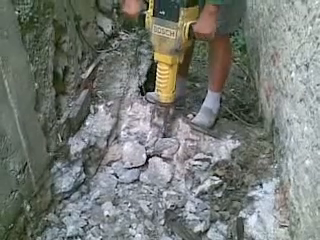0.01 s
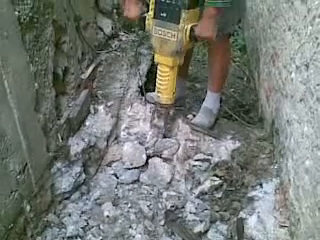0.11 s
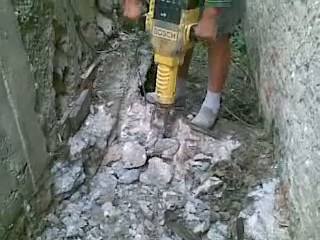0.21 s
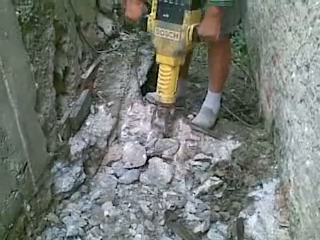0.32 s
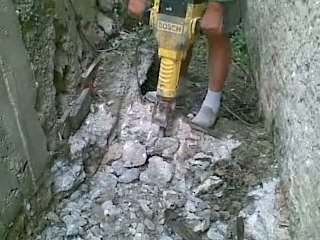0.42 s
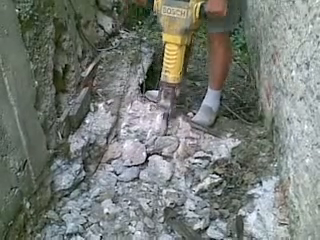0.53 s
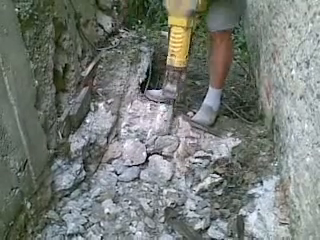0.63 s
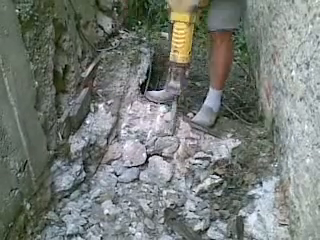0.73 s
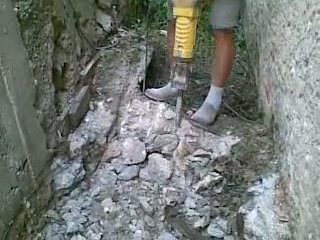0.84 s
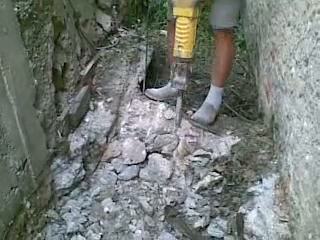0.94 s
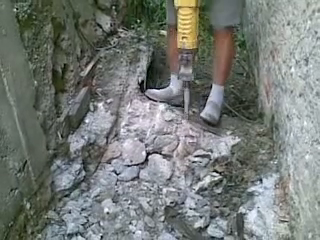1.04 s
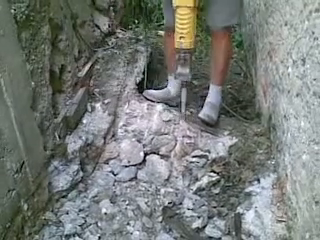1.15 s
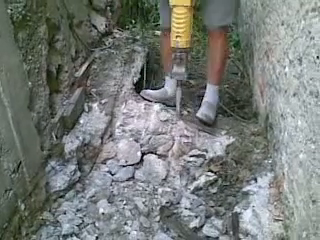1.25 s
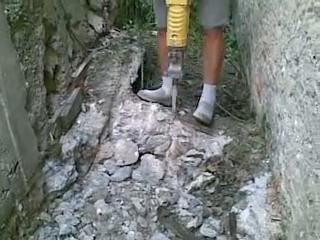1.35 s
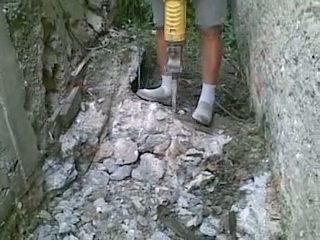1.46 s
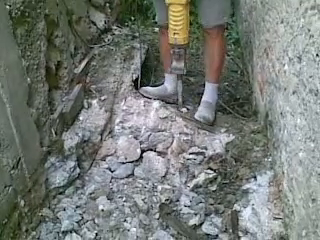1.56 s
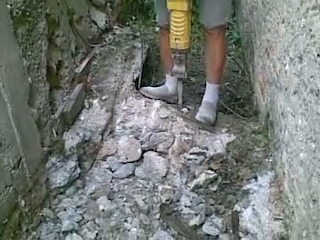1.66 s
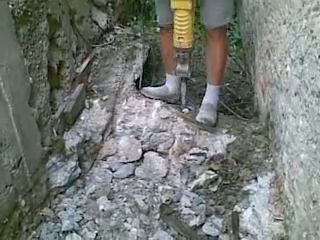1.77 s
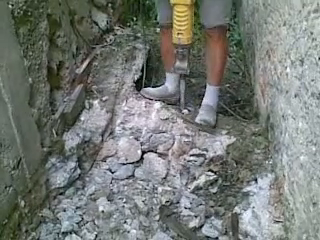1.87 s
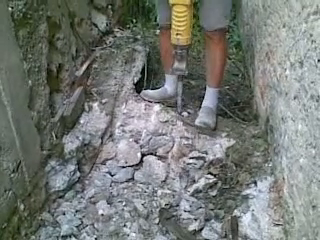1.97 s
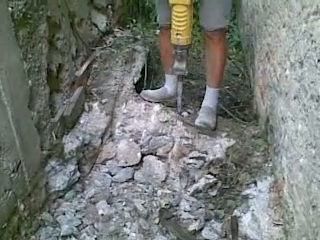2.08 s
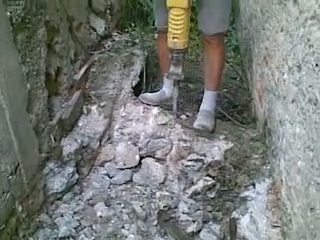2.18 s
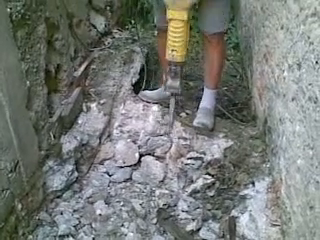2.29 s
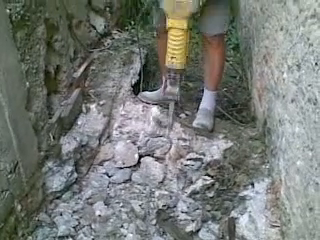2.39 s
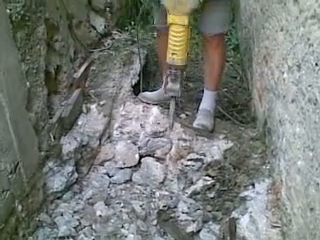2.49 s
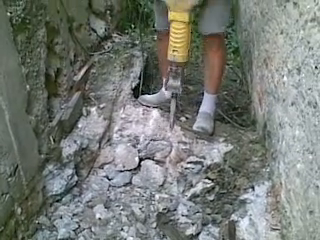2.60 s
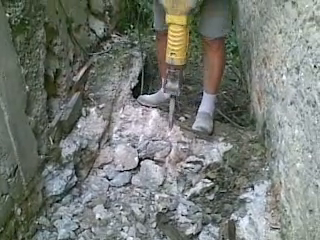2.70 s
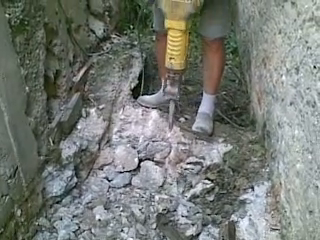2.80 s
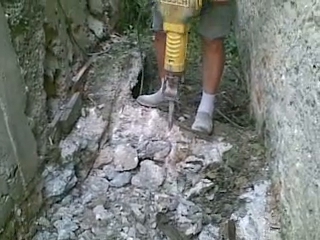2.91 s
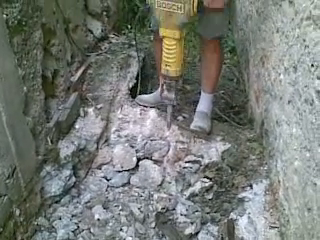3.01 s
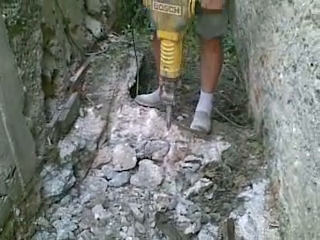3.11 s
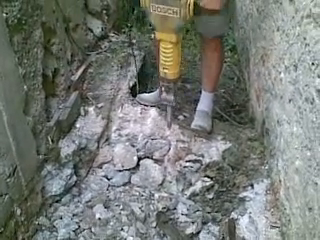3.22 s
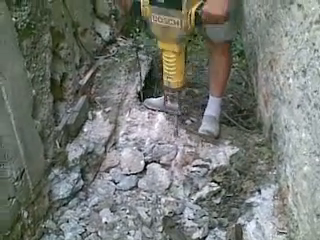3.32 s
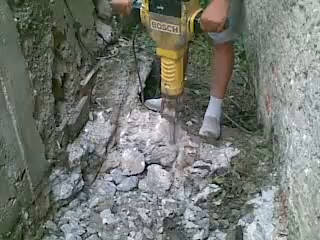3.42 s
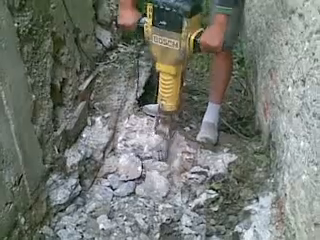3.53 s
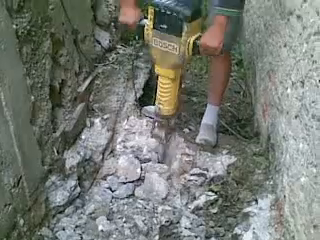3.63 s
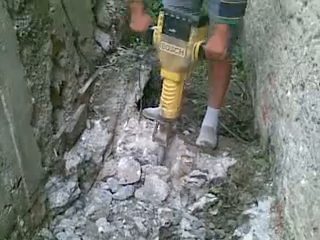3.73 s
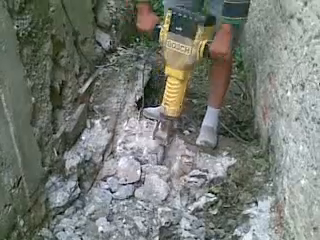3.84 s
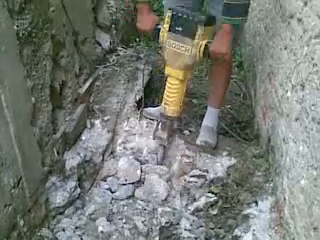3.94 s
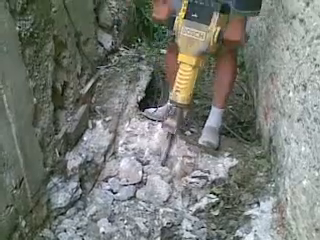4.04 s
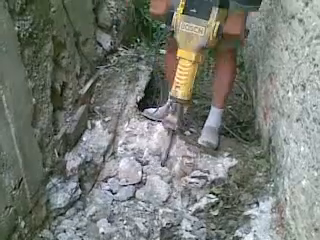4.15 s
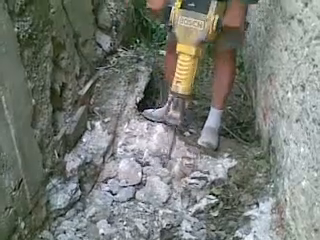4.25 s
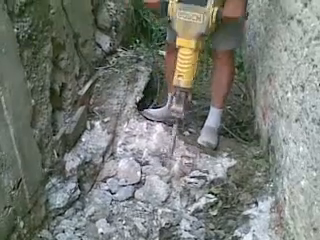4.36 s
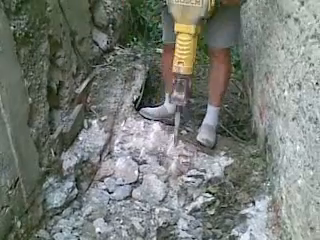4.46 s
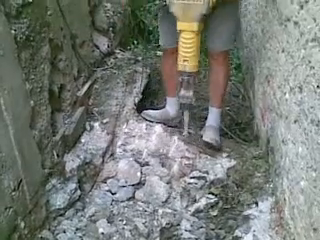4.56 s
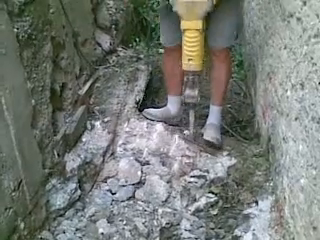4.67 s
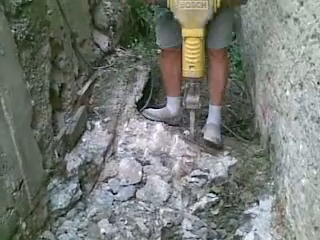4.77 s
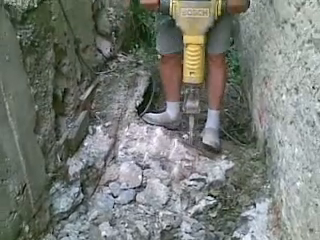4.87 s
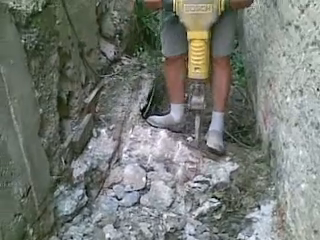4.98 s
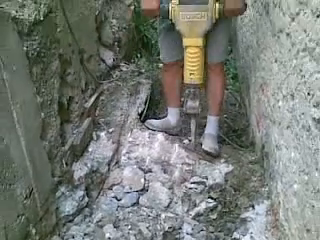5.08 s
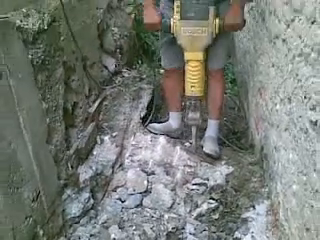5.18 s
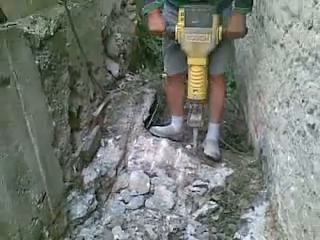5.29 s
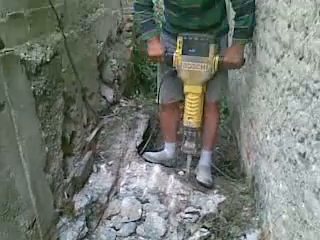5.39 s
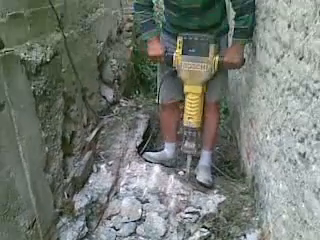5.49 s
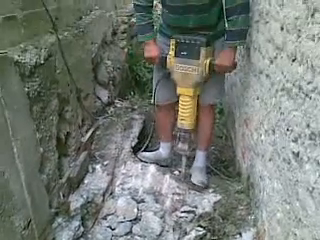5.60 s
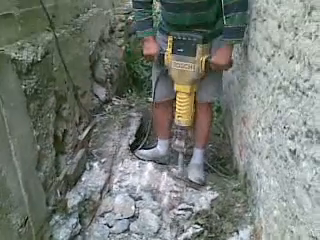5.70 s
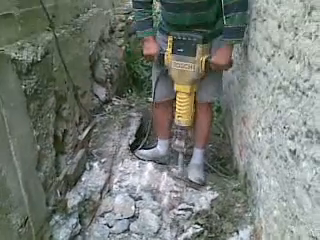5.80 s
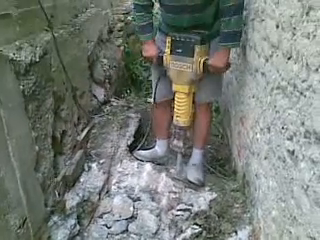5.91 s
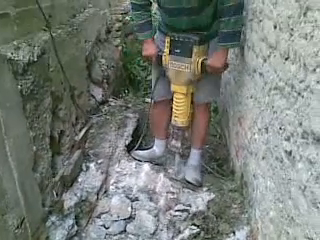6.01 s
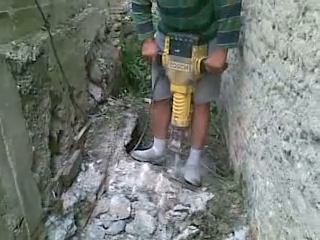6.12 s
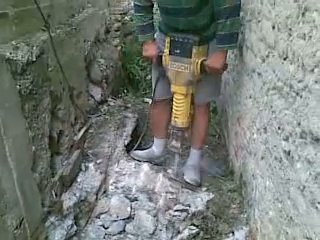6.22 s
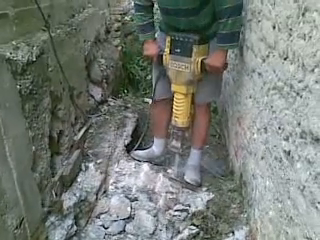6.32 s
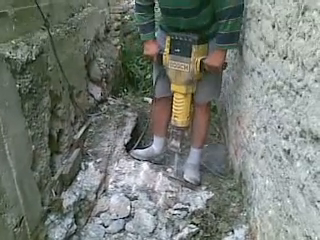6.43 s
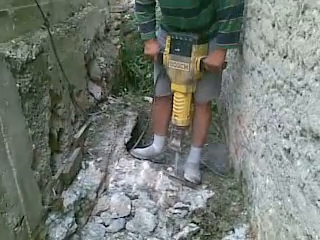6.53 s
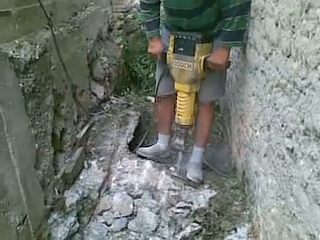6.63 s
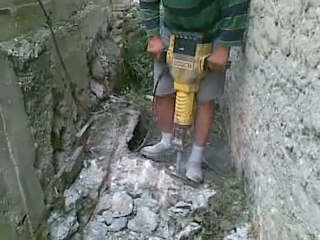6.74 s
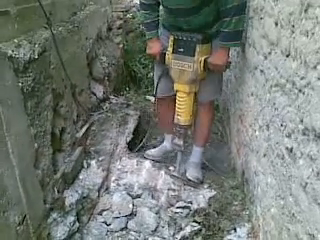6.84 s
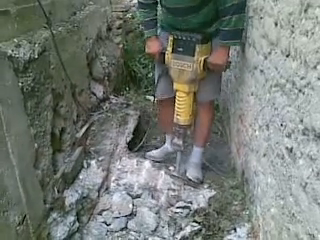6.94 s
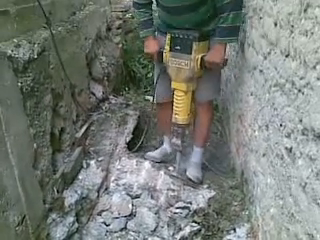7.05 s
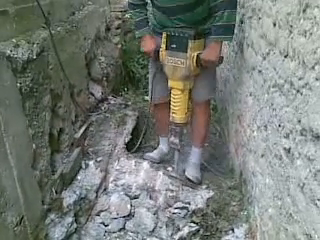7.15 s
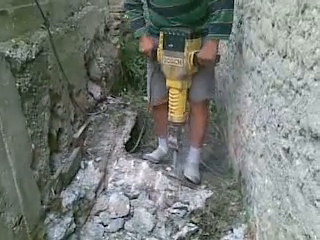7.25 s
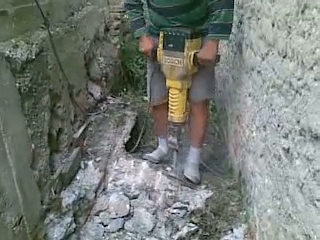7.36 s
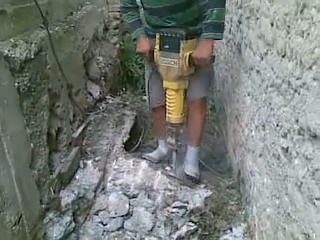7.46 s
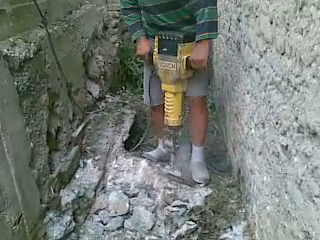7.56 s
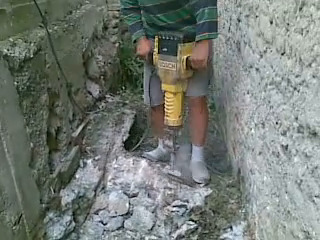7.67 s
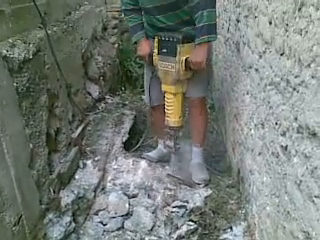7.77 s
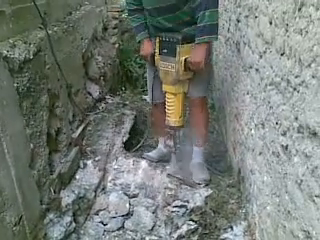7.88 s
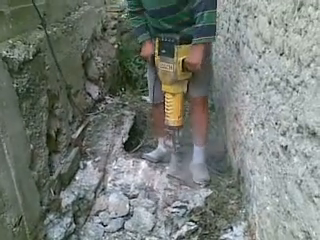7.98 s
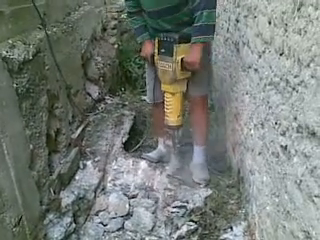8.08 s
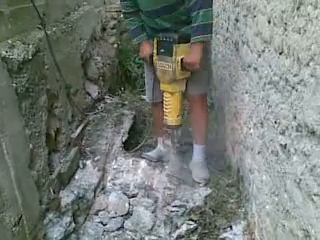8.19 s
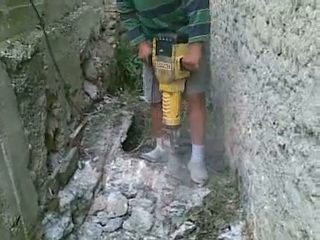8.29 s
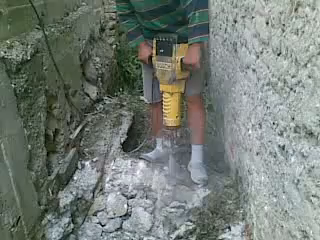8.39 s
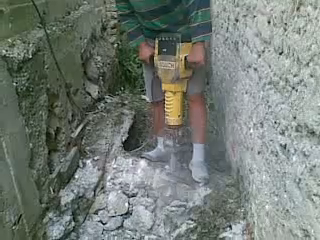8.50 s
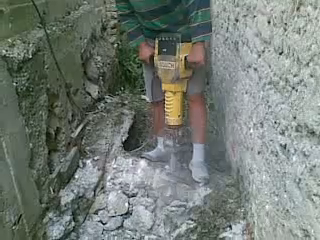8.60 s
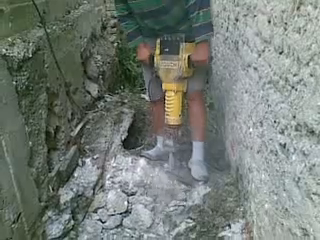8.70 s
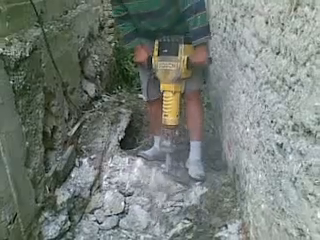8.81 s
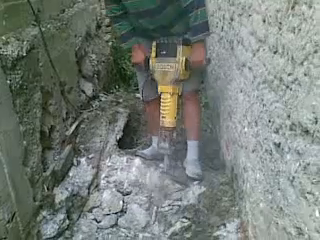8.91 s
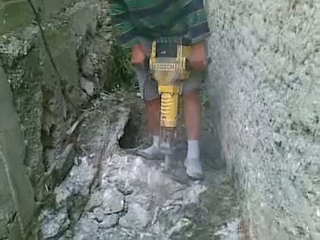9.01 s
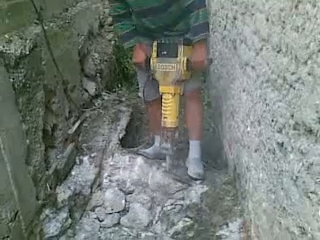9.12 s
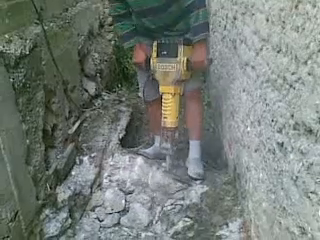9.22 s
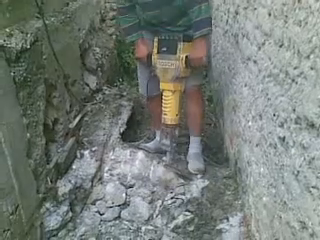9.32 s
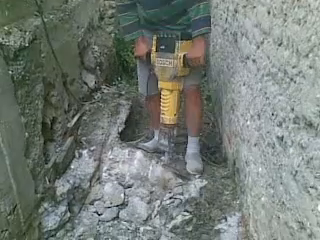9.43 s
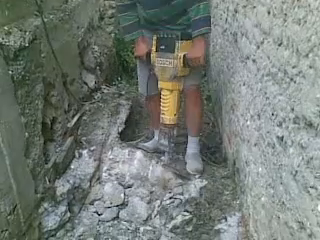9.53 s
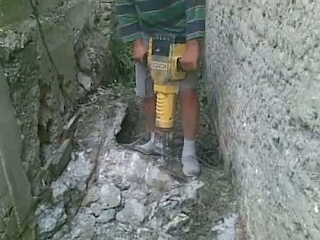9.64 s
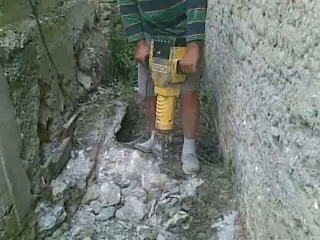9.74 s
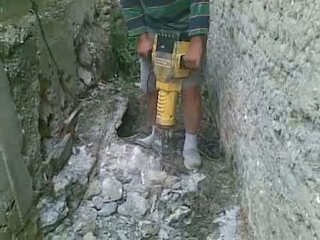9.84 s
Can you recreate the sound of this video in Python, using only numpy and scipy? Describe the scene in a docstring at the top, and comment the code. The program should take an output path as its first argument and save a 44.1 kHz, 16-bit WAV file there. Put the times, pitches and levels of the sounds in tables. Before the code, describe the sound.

Close, dry and harsh: sharp steel-on-concrete blows at about sixteen to nineteen a second over gear whirr and a high whine. The first burst winds down into spaced clacks and a near pause, a gritty restart gives a short second burst, that slows too, and the last long burst continues to the end. Faint outdoor background and low rumble sit underneath, with tight trench reflections.

```python
"""A narrow trench, where an electric demolition hammer chisels concrete rubble close to a small microphone.
The motor hammers, coasts down with loose knocks, starts again, slows once more, then hammers to the end.
Whirr, hiss and growl are shaped noise; the whine is noise in a narrow band that follows the speed, and the
gear teeth sing as sines. Each blow cracks as a noise burst, kicks the resonances of the steel chisel and
thumps the ground with decaying sines; sparse echoes from the trench walls throw the steel back."""
import sys
import numpy as np
from scipy import signal
from scipy.io import wavfile
from scipy.ndimage import uniform_filter1d

SR = 44100
rng = np.random.default_rng(int(sys.argv[2]) if len(sys.argv) > 2 else 0)


def materialize(psi):
    """Save the field psi as 16-bit PCM at rate SR to the path in sys.argv[1].

    A 1-D psi becomes a single channel; in a 2-D psi each row is a channel.
    """
    bounded = np.clip(np.atleast_2d(psi).T, -1, 1)
    quanta = np.round(bounded * 32767).astype(np.int16)
    wavfile.write(sys.argv[1], SR, quanta)


N = 438354

# Levels in the tables are relative; each layer is trimmed where it is mixed.

# Hammer blows. Each row: start in seconds, crack in dB, chatter length in seconds, chisel ring in dB.
BLOWS = [(.036,-29,0.02,-32),(.144,-31,.034,-47),(.191,-21,0.032,-29),(.244,-21,0.014,-39),(.299,-18,0.012,-39),(.353,-19.5,0.018,-39),
         (.4184,-19,0.011,-31),(.47,-19,0.028,-51),(.534,-23.5,0.015,-55),(.596,-26.5,.034,-47),(.676,-25,0.024,-49),(.756,-22.5,0.026,-55),
         (.839,-22,0.025,-49),(.935,-17.5,.016,-44),(1.0096,-24,0.029,-46),(1.126,-21.5,.012,-50),(1.238,-20.5,0.023,-52),(1.349,-22,0.016,-55),
         (1.4916,-21,0.0076,-58),(1.664,-15.5,0.012,-55),(1.8323,-21.5,0.016,-56),(2.263,-22,0.028,-31.5),(2.3,-27.5,0.011,-55),(2.424,-44,.011,-80),
         (2.541,-20,0.019,-60),(2.668,-43,.011,-78),(2.739,-39,.0098,-66),(2.794,-46,.012,-78),(3.123,-28.5,0.006,-72),(3.167,-20,0.016,-59),
         (3.199,-18,0.097,-45),(3.295,-17,0.051,-29),(3.332,-27,.034,-19),(3.404,-22.5,0.029,-19.5),(3.4884,-17,0.0074,-25.5),(3.544,-21.5,0.022,-28),
         (3.6113,-15,0.014,-26),(3.667,-19.5,0.022,-24.5),(3.722,-24,0.013,-28.5),(3.78,-25,0.028,-33),(3.8385,-20.5,.02,-28),(3.893,-23,0.015,-23),
         (3.9524,-30,0.019,-39),(4.014,-16.5,.011,-49),(4.0792,-15,0.0066,-49),(4.145,-15.5,0.0092,-49),(4.211,-16.5,0.018,-47),(4.275,-21,0.03,-46),
         (4.344,-25,0.042,-46),(4.443,-23.5,0.025,-46),(4.5343,-17,.012,-51),(4.6276,-21,0.014,-56),(4.729,-23.5,0.015,-44),(5.1953,-17.5,.018,-20),
         (5.3248,-47,.017,-72),(5.4184,-17,0.0087,-29),(5.6486,-20,.05,-21),(5.736,-19,0.025,-19.5),(5.8077,-21,0.022,-21.5),(5.8796,-20,0.024,-22),
         (5.9483,-18,0.014,-22.5),(6.0147,-18,.019,-23),(6.078,-16.5,0.013,-26),(6.1434,-17,0.012,-25),(6.2045,-18,0.025,-26),(6.2707,-19.5,.028,-19.5),
         (6.334,-15,.011,-23),(6.3959,-17.5,.032,-22.5),(6.4584,-13.5,.012,-25),(6.52,-18.5,0.021,-25),(6.585,-15.5,0.016,-24),(6.644,-19.5,0.026,-26),
         (6.706,-19.5,0.015,-30),(6.77,-12,0.014,-24),(6.8273,-17.5,0.033,-28),(6.8904,-15.5,0.012,-23.5),(6.953,-18,0.021,-20.5),(7.0174,-14.5,0.0096,-22),
         (7.075,-18,0.026,-26),(7.1397,-17.5,0.015,-23.5),(7.2013,-22,0.036,-27),(7.2624,-16,0.023,-24),(7.3327,-14,0.0097,-26),(7.3896,-17.5,0.014,-22.5),
         (7.4537,-16.5,.012,-21),(7.5197,-20,0.015,-20.5),(7.579,-21,0.017,-18),(7.644,-17.5,.012,-26),(7.707,-23,0.019,-31.5),(7.7706,-22,.017,-27),
         (7.8346,-16.5,.014,-25),(7.8995,-15.5,.013,-24.5),(7.961,-18,.021,-23),(8.0266,-17,.012,-26),(8.087,-20.5,0.013,-29),(8.151,-24,.024,-27.5),
         (8.213,-21.5,.032,-22),(8.276,-15,0.015,-35),(8.339,-17.5,0.024,-21.5),(8.3995,-17,0.016,-27),(8.4636,-13,0.0097,-29),(8.5256,-17,0.02,-26),
         (8.592,-15,0.01,-22.5),(8.6566,-20.5,.016,-21),(8.724,-20,.014,-31),(8.7838,-13.5,.01,-24),(8.847,-20,.016,-18.5),(8.898,-23.5,.021,-43),
         (8.947,-31,.038,-42),(9,-25,0.022,-29),(9.064,-23,0.023,-47),(9.1186,-18,0.013,-23),(9.17,-19.5,.016,-28),(9.2216,-24,0.019,-23),
         (9.2726,-21,0.018,-32),(9.325,-21.5,0.019,-19),(9.3791,-18.5,0.013,-29),(9.429,-16.5,0.01,-26),(9.4825,-14,0.012,-44),(9.5285,-20.5,0.016,-32),
         (9.5835,-15.5,.011,-28),(9.633,-19,0.022,-25),(9.681,-23.5,0.028,-20.5),(9.7326,-20.5,0.013,-32),(9.783,-23,0.026,-20),(9.853,-39,0.036,-30),
         (9.8939,-31,0.019,-27)]
# Steady whirr of the gears. Each row: time in seconds, level in dB.
WHIRR_LEVEL = [(0,-24.5),(.4,-25.5),(.87,-28.5),(1.3,-38.5),(2.05,-40),(2.47,-53),(2.8,-48),(2.92,-58),(3.05,-43),(3.155,-40),(3.248,-21),
               (3.5,-29.5),(3.86,-25.5),(4.32,-29.5),(4.7,-30),(5.3,-35.5),(5.557,-42),(5.59,-24.5),(5.69,-23),(5.9,-29),(7.5,-33),
               (8.23,-28.5),(8.7,-32.5),(9.08,-26),(9.94,-26.5)]
# Motor speed. Each row: time in seconds, rotor whine in Hz, whine over the whirr in dB, air hiss over it in dB.
SPEED = [(0,4120,-11,-0.5),(.2,4580,-11,0),(.3,4350,-2,0),(.55,3630,0,-1.5),(1,2480,-14,-2.5),(2.4,600,-14,-10.5),(3.1,700,-2,-5.5),
         (3.4,2870,-24,7),(3.55,3760,-23,3),(3.8,4300,-8,3.5),(4,3860,0.5,0.5),(4.25,3400,-11,-.5),(5.5,774,-33,-8),(5.73,2800,-27,4),
         (5.95,3810,-4.5,7.5),(8.75,3787,-2,5.5),(8.95,4350,-4,1),(9.2,4545,-6.5,4),(9.94,4450,-2,3.5)]
# Swells of the whirr at strokes of the unloaded piston while coasting. Each row: time in seconds, level in dB.
STROKES = [(.94,-25),(1.05,-28),(1.125,-24.5),(1.17,-30),(1.235,-26.5),(1.28,-27),(1.36,-26.5),(1.419,-29),(1.496,-28),(1.569,-30),
           (1.675,-30),(1.761,-29.5),(1.875,-31),(1.97,-30),(2.135,-32.5),(2.261,-31),(2.375,-34),(2.574,-39.5),(2.645,-53),
           (4.375,-28),(4.44,-23.5),(4.53,-34),(4.645,-24.5),(4.725,-32),(4.78,-46),(4.87,-29),(4.96,-30),(5.055,-26.5),(5.15,-39),
           (5.235,-29),(5.505,-31.5)]
# Motor powered. Each row: from and to in seconds.
POWER_ON = [(0, 0.58), (3.3, 3.67), (5.66, 9.94)]
# Spectrum of the gear whirr. Each row: frequency in Hz, density in dB per Hz.
WHIRR_SPECTRUM = [(40, -40), (130, -36), (250, -19), (330, -8.5), (420, -30.5), (600, -15), (830, -10),
                  (1500, -7), (2000, -4.5), (3000, -9.5), (4700, -18.5), (9000, -27)]
# Spectrum of the air hiss. Each row: frequency in Hz, density in dB per Hz.
HISS_SPECTRUM = [(2500, 6.5), (4000, 5.5), (5000, -0.5), (8000, 10.5), (11800, 0.5), (13800, -8),
                 (16000, -37)]
# Resonances of the cast body. Each row: frequency in Hz, width in Hz, level in dB.
HOUSING_MODES = [(507, 24, -18.5), (836, 310, -12.5), (1670, 160, -14), (2030, 160, -13), (2676, 240, -9.5),
                 (3490, 160, -13), (4986, 49, -17)]
# Low lumpy rumble, perhaps wind on the microphone. Each row: time in seconds, level in dB.
RUMBLE_LEVEL = [(0, -50), (.45, -54), (.6, -75), (1.6, -73), (1.68, -42), (1.76, -69), (2.22, -64),
                (2.3, -50), (2.42, -54), (2.5, -64), (2.9, -55), (3.03, -60), (3.07, -41.5), (3.3, -56),
                (3.9, -52), (4.1, -57), (4.5, -52), (5.1, -54), (5.7, -52)]
# Rumble band: lower and upper edge in Hz.
RUMBLE_BAND_HZ = [30, 131]
# Spectrum of the yard background. Each row: frequency in Hz, density in dB per Hz.
YARD_SPECTRUM = [(24, -34), (40, -13), (87, -28), (312, -23), (680, -21), (790, -23), (2260, -31),
                 (5050, -40), (16000, -49)]
# Gear tooth song: level of each harmonic in dB, from the fundamental up.
TOOTH_HARMONICS_DB = [0, -3, -6]
# Spectrum of the crack. Each row: frequency in Hz, density in dB per Hz.
CRACK_SPECTRUM = [(200, 0), (500, -22), (620, -2), (900, -1), (2800, -0.5), (3700, 2.5), (4700, -5),
                  (5800, 1), (8000, -4), (13000, -7), (16000, -34)]
# Chisel modes: nominal frequencies in Hz.
CHISEL_HZ = [5157, 5343, 6160, 8040, 8085, 8240, 11475, 11725, 13203, 13925, 14209, 15166, 15358]
# The same modes in the same order. Each row: level in dB, t60 in seconds.
CHISEL_MODES = [(3.5, 0.16), (4.5, 0.094), (-11, 0.053), (5.5, 0.066), (1.5, 0.029), (2, 0.081),
                (2.5, 0.073), (1.5, 0.12), (-9, 0.091), (-16, .07), (-3, 0.12), (-13.5, 0.15), (-9, 0.11)]
# Borders in Hz between the low, middle and high chisel modes.
GROUP_BORDERS_HZ = [7000, 10000]
# How the tip sits in the concrete. Each row: time in seconds, ground thump in dB,
# low modes over the ring in dB, high modes over the ring in dB.
BITE = [(0,-31,-19,-16),(.42,-39,-16,-11),(.5,-64,6,-9),(1.5,-59,9,-18),(2.26,-45,-0.5,-14),(2.55,-55,9,-9),(3.15,-32.5,-7,-15),
        (3.5,-32,-13,-9),(3.95,-39.5,-7.5,-5),(4.02,-55,6,1),(4.7,-46,2,-10),(5.4,-30.5,-23,-17),(5.7,-25.5,-20,-9),(5.9,-24,-13,2),(6.4,-26,-7.5,-3.5),(6.9,-25,-9,-0.5),
        (7.55,-29,-16,-4),(8.3,-22,-12,-0.5),(8.45,-24,-18,-7),(8.84,-35,-29,-11),(8.93,-54,-10,-14),(9.119,-32.5,-23,-12),(9.94,-32,-14,-18)]
# Chance spread from blow to blow: low modes in dB, high modes in dB.
SPLIT_DB = [2.5, 2.5]
# Ground modes. Each row: nominal frequency in Hz, level in dB, t60 in seconds, rise in seconds.
GROUND_MODES = [(67, -1, 0.18, 0.021), (177, 3, 0.096, 0.0037), (266, -2, 0.075, 0.0032),
                (490, 2.5, 0.017, 0.0023)]
# Rough growl as the motor starts again. Each row: time in seconds, band centre in Hz, level in dB.
GROWL = [(2.96, 1780, -61), (3.06, 1710, -40), (3.158, 1480, -41), (3.168, 1410, -24.5), (3.26, 1860, -20),
         (3.38, 2300, -51)]

WHINE_WIDTH_HZ = 30
STROKE_CYCLES, STROKE_MAX_S = 41.8, 0.03  # half length of a swell in whine cycles, and its limit
REST_DB, REST_AT_S, REST_S = -1, .036, 0.011  # the whirr sinks after each blow before the piston loads again
YARD_DB = -52.5
TOOTH_RATIO = .533  # nominal tooth pitch over the whine
SONG_DB, SONG_FADE_DB_PER_S = -29, 45  # tooth song under power, and its fading while coasting
LOOSE_DB, LOOSE_S = 2.5, 0.016  # low and high modes gain this much per doubling of the chatter over this length
LIGHT_DB, LIGHT_SLOPE = -21, 1  # blows with a crack under this level thump less, dB per dB
EDGE_HZ = 16100


def gain_of(db):
    """Amplitude factor of a level in dB."""
    return 10 ** (np.asarray(db) / 20)


def evened(x):
    """Scales to rms 1."""
    return x / np.sqrt(np.mean(x ** 2) + 1e-20)


def curve(rows):
    """Columns of a table interpolated at every sample; the first column is time."""
    s, *columns = np.transpose(rows)
    return [np.interp(np.arange(N) / SR, s, c) for c in columns]


def add(mix, s, sound):
    """Adds a sound in place, s seconds into the mix."""
    part = mix[round(s * SR):][:len(sound)]
    part += sound[:len(part)]


def noise(spectrum, patchy_db):
    """Random short-time spectra with drifting patches, rms 1."""
    hz = np.fft.rfftfreq(1024, 1 / SR)
    real, imag, patches = rng.standard_normal((N // 256 + 5, 513, 3)).T
    patches = uniform_filter1d(patches, size=8, axis=0)
    patches = evened(uniform_filter1d(patches, size=4, axis=1))
    point_hz, point_db = np.transpose(spectrum)
    shape_db = np.interp(np.log(hz + 1), np.log(point_hz), point_db, left=-60)[:, None]
    bins = (real + 1j * imag) * gain_of(shape_db + patchy_db * patches)
    return evened(signal.istft(bins, nperseg=1024, noverlap=768)[1][:N])


def resonate(x, hz, width_hz):
    """One moving resonance: shifts the curve hz down to zero, smooths, and shifts back."""
    turn = np.exp(2j * np.pi * np.cumsum(hz) / SR)
    pole = np.exp(-np.pi * width_hz / SR)
    return 2 * (turn * signal.lfilter([1 - pole], [1, -pole], x / turn)).real


def flutter(size, depth_db):
    """Quick random level changes of loose parts; size in samples."""
    drift = uniform_filter1d(rng.standard_normal(N), size)
    return gain_of(depth_db * evened(uniform_filter1d(drift, size)))


def housing():
    """Broad shaking heard through the resonances of the cast body."""
    shake = rng.standard_normal(N)
    return sum(gain_of(db) * evened(resonate(shake, np.full(N, hz), width_hz))
               for hz, width_hz, db in HOUSING_MODES)


def whirr_level(hz):
    """Gain of the steady whirr with a swell for each coasting stroke, longer as the speed falls."""
    t = np.arange(N) / SR
    power = gain_of(curve(WHIRR_LEVEL)[0]) ** 2
    for s, db in STROKES:
        near = slice(round((s - .15) * SR), round((s + .15) * SR))
        half_s = min(STROKE_CYCLES / hz[round(s * SR)], STROKE_MAX_S)
        power[near] += gain_of(2 * db) * np.exp(-((t[near] - s) / half_s) ** 2)
    return np.sqrt(power)


def rests():
    """Gain of the whirr between blows: a brief dip before the piston loads again."""
    t, db = np.arange(3000) / SR, np.zeros(N)
    for s, *_ in BLOWS:
        add(db, s, REST_DB * np.exp(-((t - REST_AT_S) / REST_S) ** 2))
    return gain_of(db)


def motor():
    """Gears whirr in the housing, air hisses, and the rotor whines at its speed."""
    hz, whine_db, hiss_db = curve(SPEED)
    whine = evened(resonate(rng.standard_normal(N), hz, WHINE_WIDTH_HZ))
    whine = whine * flutter(size=900, depth_db=3.0)  # broken by backlash
    whirr = noise(WHIRR_SPECTRUM, patchy_db=2.05) + housing()
    hiss = noise(HISS_SPECTRUM, patchy_db=5.3)
    running = whirr + gain_of(whine_db - 3) * whine + gain_of(hiss_db) * hiss
    level = gain_of(-3.0) * whirr_level(hz) * rests()
    return flutter(size=300, depth_db=2.02) * level * running


def rumble():
    """Lumpy low noise that comes and goes."""
    band = signal.butter(2, RUMBLE_BAND_HZ, "band", fs=SR, output="sos")
    low = evened(signal.sosfilt(band, rng.standard_normal(N)))
    return gain_of(curve(RUMBLE_LEVEL)[0]) * flutter(size=1500, depth_db=6.5) * low


def yard():
    """Faint steady background noise."""
    return gain_of(YARD_DB) * noise(YARD_SPECTRUM, patchy_db=1.4)


def coasting():
    """Seconds since the power was last on."""
    at = np.arange(N)
    on = sum((at >= a * SR) & (at <= b * SR) for a, b in POWER_ON) > 0
    return (at - np.maximum.accumulate(at * on)) / SR


def gear_teeth():
    """The piston squeezes its air cushion before each blow: the teeth sing and the speed sags."""
    t, load, sag = np.arange(2000) / SR, np.zeros(N), np.zeros(N)
    for s, *_ in BLOWS:
        add(load, s - .024, np.exp(-((t - .016) / 0.0096) ** 2))
        add(sag, s - .024, t / 0.022 * (t < .032))
    tooth_hz = TOOTH_RATIO * curve(SPEED)[0] * (1.02 - 0.082 * sag)
    turns = np.cumsum(tooth_hz) / SR
    teeth = np.zeros(N)
    for k, db in enumerate(TOOTH_HARMONICS_DB, start=1):
        teeth += gain_of(db) * flutter(size=200, depth_db=2.5) * np.sin(2 * np.pi * k * turns)
    return gain_of(SONG_DB - SONG_FADE_DB_PER_S * coasting()) * load * teeth


def cracks():
    """A sharp strike, a chatter of bounces while the chisel is loose, then grit settling."""
    t, strength = np.arange(5000) / SR, np.zeros(N)
    onset = 1 - np.exp(-t / 0.00027)
    strike = 0.36 * np.exp(-t / 0.0031)
    grit = 0.21 * np.exp(-t / 0.016)
    for s, crack_db, chatter_s, _ in BLOWS:
        chatter = 1 / (1 + (t / max(chatter_s, .002)) ** 5)
        add(strength, s, gain_of(crack_db - 3.5) * onset * (strike + chatter + grit))
    rubble = noise(CRACK_SPECTRUM, patchy_db=5.26) + gain_of(-3.5) * housing()
    return strength * flutter(size=60, depth_db=0.5) * rubble


def bite():
    """Thump and mode balance in dB at the moment of each blow."""
    s, *columns = np.transpose(BITE)
    return [np.interp(np.array(BLOWS)[:, 0], s, c) for c in columns]


def chisel():
    """Steel modes ring; each bounce during the chatter kicks every mode by a new amount."""
    blows, modes = np.array(BLOWS), len(CHISEL_MODES)
    start_s, chatter_s, ring_db = blows[:, :1], blows[:, 2:3], blows[:, 3]
    when = rng.random((len(blows), modes, 4))  # four kicks per blow and mode
    size = rng.standard_normal((len(blows), modes, 4))
    grip = rng.standard_normal((len(blows), modes))
    latest = np.searchsorted(blows[:, 0], np.arange(N) / SR).clip(1) - 1  # blow in force at each sample
    _, low_db, high_db = bite()
    split_db = SPLIT_DB * rng.standard_normal((len(blows), 2))
    split_db = split_db + LOOSE_DB * np.log2(chatter_s / LOOSE_S)
    groups_db = ring_db + np.array([low_db + split_db[:, 0], 0 * low_db, high_db + split_db[:, 1]])
    out = np.zeros(N)
    for k, (hz, (db, t60_s)) in enumerate(zip(CHISEL_HZ, CHISEL_MODES)):
        level = gain_of(db + groups_db[np.searchsorted(GROUP_BORDERS_HZ, hz)])
        kick_s = start_s + .8 * chatter_s * when[:, k] ** 2
        kicks = np.zeros(N + SR)
        kicks[(kick_s * SR).astype(int)] = level[:, None] * gain_of(2 * size[:, k])
        detuned_hz = hz + 30.0 * grip[latest, k]  # the bite of the tip shifts the pitch a little
        width_hz = np.log(1000) / np.pi / t60_s
        out += resonate(kicks[:N], detuned_hz, width_hz) * SR / (2 * np.pi * width_hz)
    return gain_of(-1.5) * out * flutter(size=150, depth_db=3.0)  # the rubble damps the tip unevenly


def ring(t, hz, db, t60_s):
    """Decaying sine."""
    return gain_of(db - 60 * t / t60_s) * np.sin(2 * np.pi * hz * t)


def thumps():
    """The slab rings low; a deep dip of air pressure follows the blow."""
    t, out = np.arange(5000) / SR, np.zeros(N)
    crack_db = np.array(BLOWS)[:, 1]
    thump_db = bite()[0] + LIGHT_SLOPE * np.minimum(crack_db - LIGHT_DB, 0)
    chance = rng.standard_normal((len(BLOWS), 3))
    for (s, *_), db, (pitch, force, delay) in zip(BLOWS, thump_db, chance):
        detune = 1 + .025 * pitch
        slab = sum(ring(t, hz * detune, mode_db + 1.05 * force, t60_s) * (1 - np.exp(-t / rise_s))
                   for hz, mode_db, t60_s, rise_s in GROUND_MODES)
        u = (t - .0142 - 0.00043 * delay) / 0.0018
        dip = 1.74 * (1 - 0.42 * u ** 2) * np.exp(-u ** 2 / 2)
        add(out, s, gain_of(db + 2.5) * (slab - dip))
    return out


def trench(x, t60_s):
    """Sparse echoes of random sign between the close walls."""
    slots = np.arange(130, SR // 4, 20)
    at = slots + rng.integers(0, 20, len(slots))
    taps = np.zeros(SR // 4 + 20)
    taps[at] = rng.choice([-1., 1.], len(slots)) * gain_of(-60 * slots / SR / t60_s)
    return signal.oaconvolve(x, taps / np.linalg.norm(taps))[:N]


def growl():
    """Straining noise in a sliding band as the motor starts again."""
    hz, db = curve(GROWL)
    band = resonate(rng.standard_normal(N), hz, width_hz=800.0)
    return gain_of(db) * evened(resonate(band, hz, width_hz=800.0))


def scene():
    """Steel with its echoes, the machine and ground, and the background."""
    machine = motor() + rumble() + gear_teeth() + thumps() + growl()
    steel = cracks() + chisel()
    echoes = gain_of(-9.0) * trench(steel, t60_s=0.15)
    return (steel + echoes + machine + yard())[None]


def record(dry):
    """The small microphone drops the deepest bass, its preamp rounds off the loudest blows; then the band limit."""
    thin = signal.sosfilt(signal.butter(2, 45.0, "high", fs=SR, output="sos"), dry)
    soft = .62 * np.tanh(thin / .62)
    band_limit = signal.firwin(511, EDGE_HZ, window=("kaiser", 9), fs=SR)
    return signal.oaconvolve(soft, band_limit[None], "same")


dry = scene()
out = record(dry)
materialize(out)
```